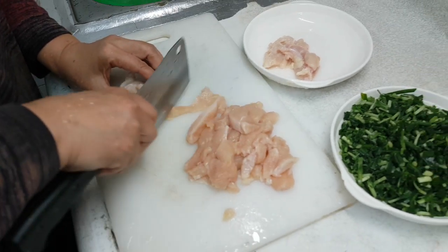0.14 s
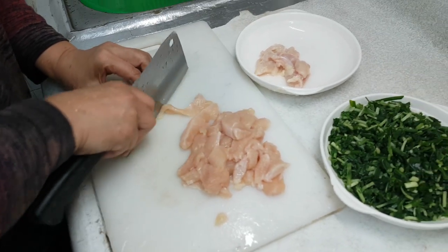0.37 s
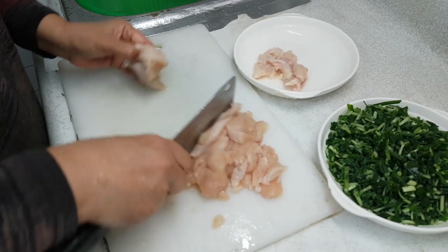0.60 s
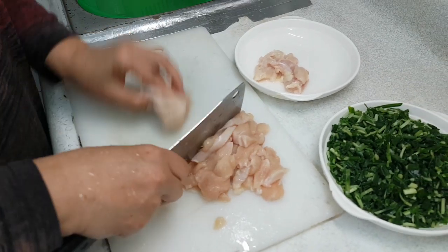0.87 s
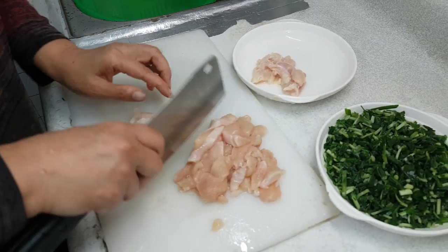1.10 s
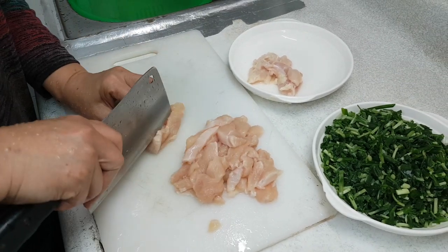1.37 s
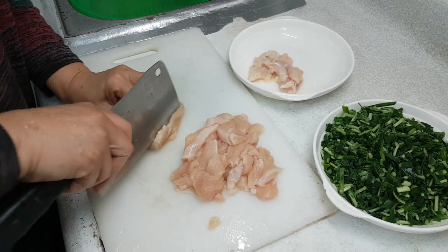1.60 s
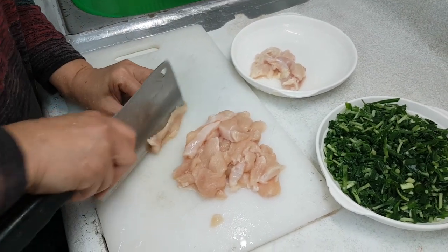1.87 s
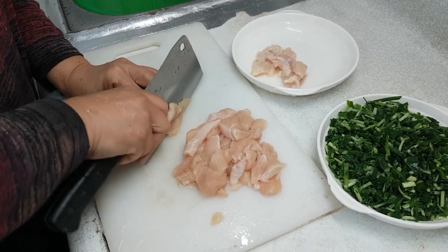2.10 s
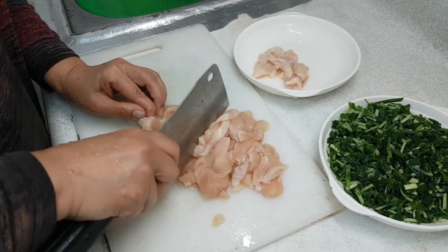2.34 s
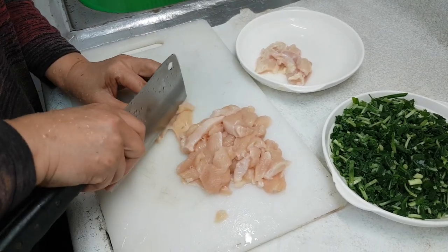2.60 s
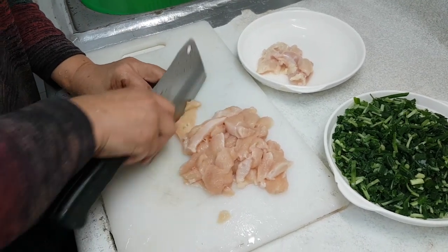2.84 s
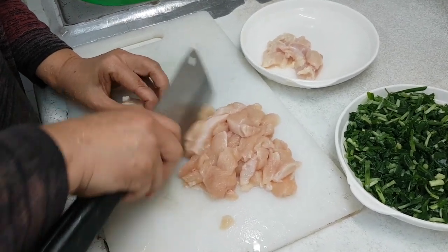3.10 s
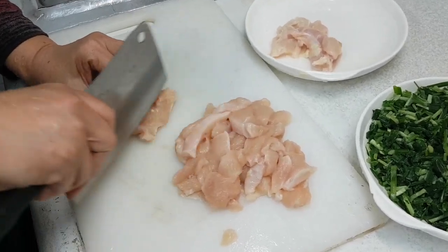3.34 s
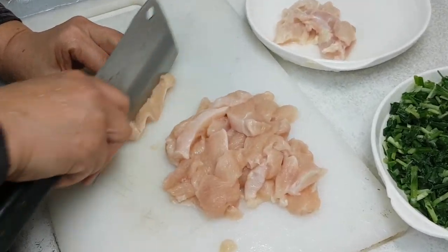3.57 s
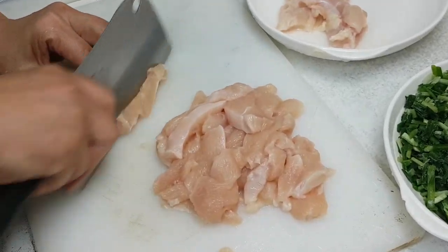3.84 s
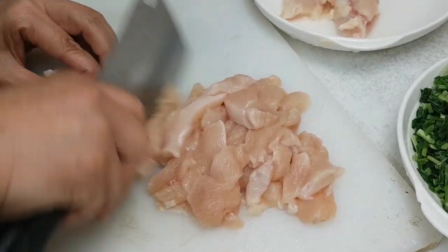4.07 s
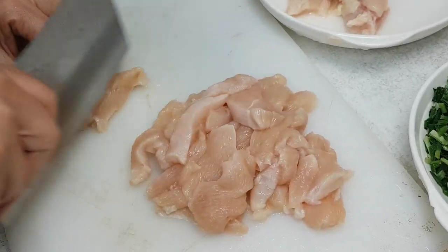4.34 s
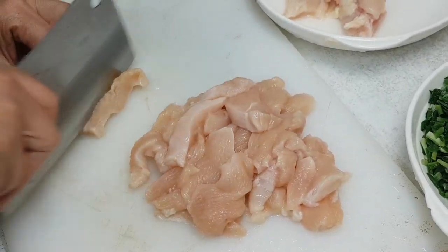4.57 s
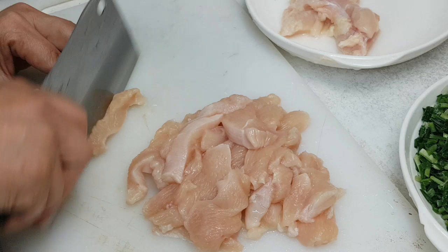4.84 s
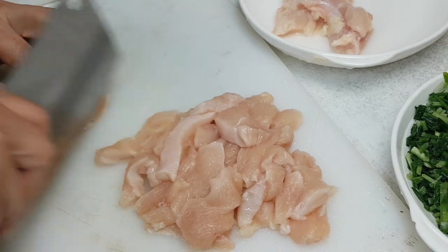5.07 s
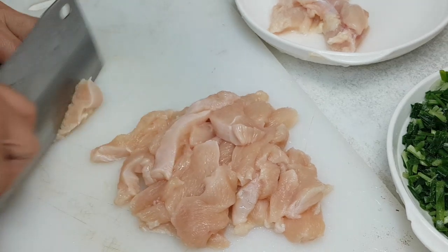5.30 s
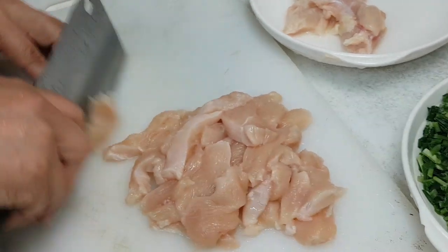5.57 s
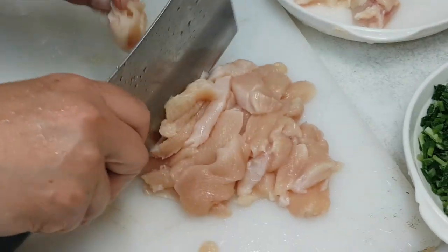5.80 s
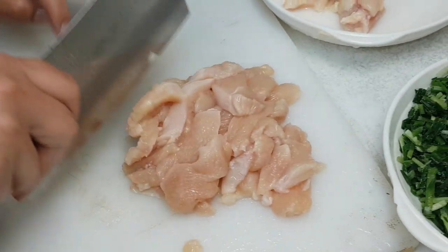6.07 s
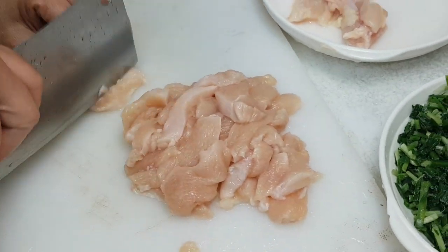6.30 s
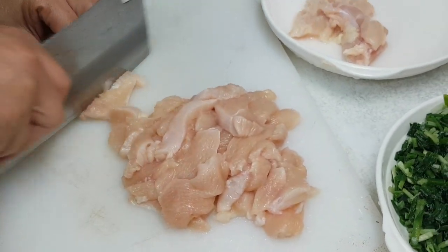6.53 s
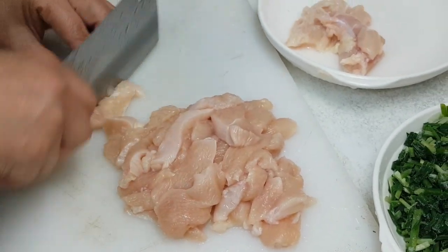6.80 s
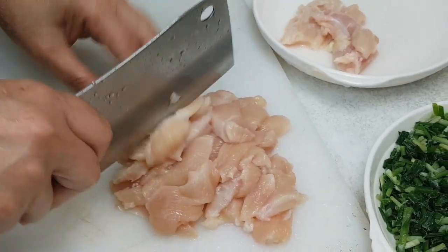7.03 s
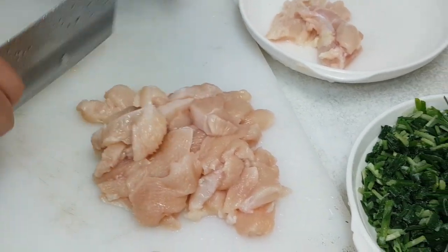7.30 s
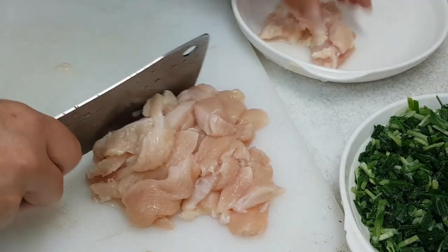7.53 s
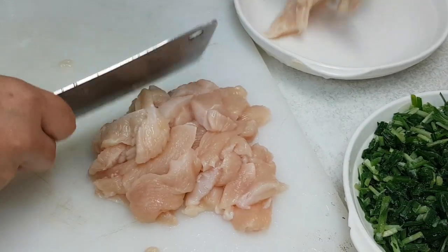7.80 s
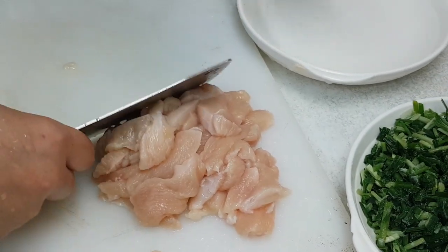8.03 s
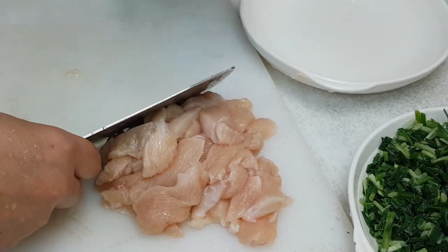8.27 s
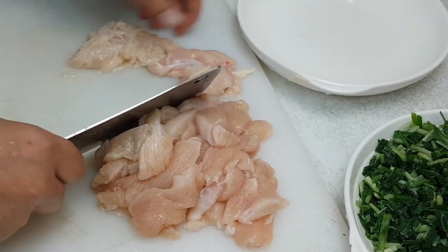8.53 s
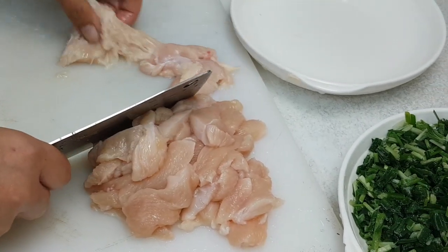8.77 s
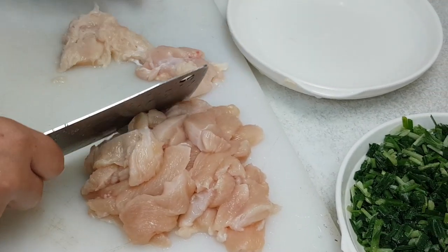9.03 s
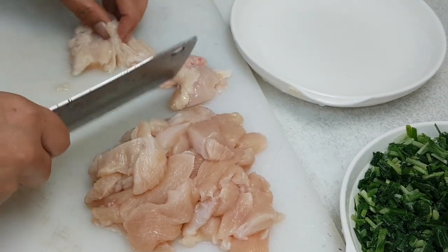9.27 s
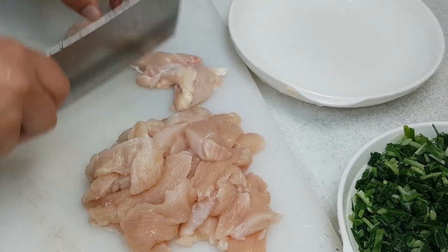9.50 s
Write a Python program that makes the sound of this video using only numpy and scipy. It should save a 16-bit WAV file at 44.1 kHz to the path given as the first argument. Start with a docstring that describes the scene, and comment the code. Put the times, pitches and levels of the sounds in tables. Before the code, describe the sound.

Irregular cleaver knocks and short dragging scrapes through wet raw meat on a plastic cutting board, close up, over faint appliance hum.

```python
"""Knocks, scrapes and wet smacks: a cleaver slices raw meat on a plastic board on a kitchen counter.
It is heard half a metre away at a hand-held phone. Blows and dragged edge make board and blade ring,
the counter top booms, the edge squeaks on wet plastic and meat lets go in short bursts of noise.
Fingers tick on the phone's right end; a small hard kitchen echoes the cutting over a faint appliance hum."""
import sys
import numpy as np
from scipy import signal
from scipy.fft import rfft, irfft, next_fast_len
from scipy.io import wavfile
from scipy.ndimage import uniform_filter1d, map_coordinates

SR = 44100
rng = np.random.default_rng(int(sys.argv[2]) if len(sys.argv) > 2 else 0)


def linear_from_db(decibels):
    """Turn decibels (scalar or array-like) into linear amplitude factors; 0 gives 1."""
    return 10 ** (np.asarray(decibels, float) / 20)


def digitize_waveform(pressure):
    """Quantize a signal to 16-bit integers and store it at the path in sys.argv[1].

    Rows of a 2-D input are taken as channels; values are limited to [-1, 1].
    """
    field = np.atleast_2d(pressure).T
    bounded = np.clip(field, -1, 1)
    quanta = np.round(bounded * 32767).astype(np.int16)
    wavfile.write(sys.argv[1], SR, quanta)


N = 425104  # length [samples]
T = np.arange(N) / SR  # time [s]

# ways the board and the blade ring, from low to high: (pitch [Hz], level [dB], time to fall 60 dB [s])
BOARD_LOW_MODES = [(159.2, -10.5, 0.17), (304.9, -2, 0.19), (355.3, -7.5, 0.13), (452, -1.5, 0.076),
                   (601.6, -10.5, 0.13)]
BOARD_MID_MODES = [(706, -12.5, 0.1), (796, 0, 0.07), (862, -0.5, 0.062), (976.4, 0.5, 0.035),
                   (1067, -6, 0.049), (1168, -13.5, 0.099), (1330, -15, 0.0335), (1491, -9.5, 0.045),
                   (1680, -16.5, .06)]
BLADE_MODES = [(1962, -2.5, 0.057), (2169, -4.5, 0.11), (2190, -8, 0.067), (2350, 0.5, 0.048),
               (2576, -3.5, 0.044), (2793, -8, 0.061), (3284, -7.5, 0.04), (3575, -5, 0.042),
               (4580, -9, 0.034), (5320, -16.5, .03)]
# the highest ringing, of the steel edge: (pitch [Hz], level [dB], time to fall 60 dB [s])
STEEL_MODES = [(4500, -7, .05), (4900, 0, .08), (5720, -7, .05), (6600, -5, .06), (7600, -9, .04),
               (8700, -4, .05), (10200, -8, .04), (11300, -7, .04)]
# colour of the wet splash and of torn fibres: (frequency [Hz], level [dB per Hz])
HISS_COLOUR = [(900, -24), (1600, 1.5), (2300, -9), (3600, -5), (6000, -11), (9000, -16.5), (12500, -17.5),
               (15700, -17.5), (16200, -42)]


def colour(x, points):
    """Noise shaped by (frequency [Hz], level [dB]) points, then scaled to rms 1."""
    hz, db = np.transpose(points)
    size = 2 * next_fast_len(N // 2 + 1)
    f = np.maximum(np.arange(size // 2 + 1) * SR / size, 1)
    gain = linear_from_db(np.interp(np.log(f), np.log(hz), db))
    y = irfft(rfft(x, size) * gain, size)[:N]
    return y / np.std(y)


def fade(t60, size):
    """Exponential decay that falls 60 dB in t60 seconds."""
    return np.exp(-np.log(1000) * np.arange(size) / SR / t60)


def ring(modes, spot=0, rise_s=0.00013):
    """Sound of a struck object, peak 1: fading sines whose pitch and share shift with the place of contact."""
    t = T[:SR // 3]
    hz, db, t60 = np.transpose(modes)[:, :, None]
    spot = np.reshape(spot, (-1, 1))[:len(modes)]
    share = linear_from_db(db + 2.5 * spot)
    shifted_hz = hz * (1 + 0.02 * spot[::-1])
    h = np.sum(share * fade(t60, len(t)) * np.sin(2 * np.pi * shifted_hz * t), axis=0)
    h = h * np.sin(np.pi / 2 * np.minimum(t / rise_s, 1)) ** 2  # the contact takes time to build
    return h / np.max(np.abs(h))


def through(x, h):
    """Every sample of x sets off a copy of h (convolution), cut to length."""
    return signal.fftconvolve(x, h)[:N]


def add(track, s, piece):
    """Mix a piece in at time s."""
    i = int(s * SR)
    track[..., i:i + piece.shape[-1]] += piece[..., :N - i]


def walk(rate):
    """Slow random wandering, spread 1; a higher rate [Hz] wanders faster."""
    k = int(SR / rate)
    steps = np.repeat(rng.standard_normal(N // k + 1), k)
    smooth = uniform_filter1d(uniform_filter1d(steps, k), k)[:N]
    return smooth / np.std(smooth)


def swells(rows):
    """Power of each row's swell per millisecond, peak 1, with the columns after peak time, rise and fall."""
    s, rise, fall, *columns = np.transpose(rows)[:, :, None]
    t = np.arange(0, N / SR + .01, .001)
    away = np.where(t < s, (s - t) / rise, (t - s) / fall)
    # 30.5 dB down after one rise or fall time; a power of 1 would be straight in dB, more rounds the top
    return linear_from_db(-2 * 30.5 * np.minimum(away, 10) ** 1.2), columns


def per_sample(x):
    """Millisecond values spread over the samples."""
    return np.interp(T * 1000, np.arange(len(x)), x)


def summed(power, db):
    """Amplitude per sample of overlapping swells, whose powers add."""
    return per_sample(np.sqrt(np.sum(power * linear_from_db(2 * db), axis=0)))


def turning(hz, wobble, rate):
    """Phase of a tone whose pitch wavers: the running sum of its frequency."""
    return 2 * np.pi * np.cumsum(hz * (1 + wobble * walk(rate))) / SR


def pair(x, lag_s, pan_db, order=3):
    """Two microphone ports: the right one hears it later, by a lag that drifts as hand and blade move."""
    late = np.arange(N) - lag_s * SR * (1 + 0.56 * walk(4))
    left = x * linear_from_db(pan_db / 2)
    right = map_coordinates(x, [late], order=order) * linear_from_db(-pan_db / 2)
    return np.array([left, right])


def air():
    """Appliance hum and microphone hiss: shared and opposite noise, mixed to be alike only in the bass."""
    # colour of hum and hiss: (frequency [Hz], level [dB per Hz])
    air_colour = [(15, -20.5), (25, 6), (45, -6), (100, -3.5), (160, -7), (300, -13.5), (480, -10),
                  (620, -16.5), (1300, -23.5), (2100, -13.5), (3200, -26.5), (5000, -35.5), (9000, -42.5),
                  (12000, -35.5), (15700, -30.5), (16100, -57.5)]
    # likeness of left and right before the final mix: (frequency [Hz], likeness [-1 to 1])
    likeness = [(60, 0.82), (130, 0.84), (290, -0.27), (640, -0.093), (1410, -0.59), (3100, -0.44),
                (6820, -0.0018), (15000, -0.15)]
    hz, alike = np.transpose(likeness)
    parts = []
    for sign in (1, -1):
        noise = colour(rng.standard_normal(N), air_colour)
        parts.append(colour(noise, np.transpose([hz, 10 * np.log10(1 + sign * alike)])))
    mid, side = parts
    left = linear_from_db(-1.5) * (mid + linear_from_db(-7.5) * side)
    right = linear_from_db(1.0) * (mid - linear_from_db(-4) * side)
    return linear_from_db(-62.5) * np.array([left, right])


def kitchen(x):
    """Small hard room: dense echo as fading noise, its own for each port, shorter in the treble."""
    out = []
    for noise in rng.standard_normal((2, SR // 2)):
        low = signal.lfilter([.25], [1, -.75], noise)
        treble = noise - low
        h = low * fade(0.18, len(low)) + treble * fade(0.13, len(low)) * linear_from_db(5.5)
        h = h * np.minimum(1, T[:len(h)] / 0.0031)  # the echo builds up over 3.1 ms
        out.append(through(x, h / np.sqrt(np.sum(h ** 2))))
    return np.array(out)


def taps():
    """Fingers shift on the phone: a tick, lumpy tail and low bump, carried by the case mostly to the right."""
    # (time [s], level before filter and doubling [dB], pitch [Hz], bump relative to the tap [dB],
    #  left relative to right [dB], time to fall 60 dB [s])
    finger_taps = [(0.818, -27, 1113, -5, -31, 0.004), (2.659, -40.5, 517, -8, -30, 0.016),
                   (4.199, -51, 1250, -4, -7, 0.036), (4.246, -45, 705, -15, -28, 0.093),
                   (4.289, -47, 572, -21, -24, 0.031), (4.329, -37.5, 350, -11, -24, 0.0092),
                   (5.248, -49.5, 898, -14, -20, 0.057), (5.286, -42, 416, -10, -26, 0.074),
                   (5.7137, -30, 612.5, 0, -18, 0.13), (5.7362, -26, 570, -1, -26, 0.056),
                   (5.762, -31.5, 463, -4, -24, 0.067), (5.809, -45, 784, -4, -19, 0.061),
                   (5.829, -38.5, 485, 8, -18, 0.05), (5.847, -33, 503, -7, -27, 0.018)]
    out, t = np.zeros((2, N)), T[:4096]
    size = len(t)
    dull = signal.butter(4, 1700, fs=SR, output="sos")
    fleshy = signal.butter(2, [180, 800], "band", fs=SR, output="sos")
    chance = rng.standard_normal((len(finger_taps), size))
    for (s, db, hz, bump_db, pan_db, t60), noise in zip(finger_taps, chance):
        tick = -(0.75 * fade(0.004, size) + 0.33 * fade(t60, size)) * np.cos(2 * np.pi * hz * t)
        lumps = 1.83 * fade(t60 + 0.01, size) * signal.sosfilt(fleshy, noise)
        bump = linear_from_db(bump_db) * fade(0.032, size) * np.sin(2 * np.pi * 170 * t)
        gains = 2 * linear_from_db(db + np.array([[pan_db], [0]]))
        add(out, s, gains * signal.sosfilt(dull, tick + lumps + bump))
    return out


def boom():
    """The counter's lowest mode under the pressing blade: a wavering tone and a rumble of looser neighbours."""
    # one row per swell: (peak time [s], rise [s], fall [s], level [dB], pitch [Hz])
    pushes = [(.276, 0.035, .1, -36.5, 105.3), (.444, 0.16, .17, -38, 100.3),
              (.6, 0.069, .16, -47.5, 108.2), (.834, 0.021, .05, -43, 92), (.998, 0.065, .2, -47.5, 94.8),
              (1.82, 0.2, .14, -52, 105), (2.095, 0.029, 0.063, -29, 78.5),
              (2.145, 0.068, .2, -35.5, 82.66), (2.81, 0.036, .2, -58.5, 108.8),
              (2.925, .025, .11, -37.5, 104.1), (3.046, 0.11, .25, -45.5, 97.6),
              (3.61, 0.042, .28, -55.5, 96.56), (3.862, 0.029, .2, -51.5, 100), (3.938, .06, .2, -37, 106),
              (4.114, 0.12, .07, -43.5, 101.4), (4.74, 0.089, .19, -38, 100),
              (4.984, 0.096, .1, -36, 101.8), (5.09, 0.11, .18, -50.5, 99.14),
              (5.276, 0.069, .07, -61.5, 112.1), (5.385, 0.067, .15, -46.5, 103),
              (5.447, 0.033, 0.092, -31.5, 100), (5.5, 0.058, .16, -37, 100),
              (5.684, 0.17, .12, -45.5, 120.9), (5.84, 0.13, .04, -46.5, 111.2),
              (6.02, .04, .26, -43, 101.9), (6.604, .045, .05, -38, 97.8),
              (6.685, .025, 0.0916, -31.5, 100), (6.755, 0.11, 0.21, -41.5, 97.8),
              (6.902, 0.13, .17, -46, 105), (7.442, 0.028, .07, -31.5, 97.7), (7.49, 0.043, .3, -48, 100),
              (7.654, .04, .22, -43.5, 97), (8.076, 0.056, .14, -43.5, 99), (8.244, 0.059, .18, -45.5, 100),
              (8.515, 0.047, .15, -35, 98.9), (8.6, 0.075, .3, -49, 99.3), (9.24, 0.071, .12, -52, 103.8),
              (9.442, .12, .2, -54, 84.5)]
    power, (db, hz) = swells(pushes)
    power = power * linear_from_db(2 * db)
    rest, rest_hz = linear_from_db(2 * -74), 100  # faint power and pitch between pushes
    total = np.sum(power, axis=0) + rest
    pitch = per_sample((np.sum(power * hz, axis=0) + rest * rest_hz) / total)  # the strongest push leads
    tone = np.sqrt(2) * np.sin(turning(pitch, wobble=0.061, rate=17))
    rumble = colour(rng.standard_normal(N),
                    [(20, -6.5), (45, -8.5), (100, 4), (160, -4.0), (240, -13.5), (500, -55)])
    return per_sample(np.sqrt(total)) * (tone + linear_from_db(-4.0) * rumble)


def smacks():
    """Wet meat lets go of steel or skin: short fading bursts of noise in one high band."""
    # (time [s], level, set 1.5 dB lower before filtering [dB], pitch [Hz], time to fall 60 dB [s])
    releases = [(0.0513, -42.5, 8340, 0.012), (1.0497, -58, 7700, 0.041), (1.0888, -56, 13700, 0.03),
                (1.4636, -57, 13740, 0.03), (1.7218, -54, 13900, 0.029), (2.414, -39, 12800, 0.013),
                (3.356, -44, 6420, 0.024), (4.158, -46.5, 6640, 0.054), (4.8424, -57, 4340, 0.03),
                (6.352, -48, 15000, 0.034), (7.1852, -53, 8400, 0.03), (7.7816, -52, 4850, 0.047),
                (7.9967, -49, 8400, 0.025), (8.712, -47, 4940, 0.038), (8.794, -55, 10970, 0.039),
                (8.835, -47.5, 4840, 0.033), (8.9231, -56.5, 8280, 0.047), (9.2237, -60, 4320, 0.021)]
    out = np.zeros(N)
    for (s, db, hz, t60), noise in zip(releases, rng.standard_normal((len(releases), 4096))):
        band = signal.butter(2, [hz * 0.84, hz * 1.14], "band", fs=SR, output="sos")
        add(out, s, linear_from_db(db - 1.5) * signal.sosfilt(band, noise) * fade(t60, len(noise)))
    return out


def squeak():
    """The edge sings on wet plastic: a tone and its octave sink as they fade, fluttering with grip and slip."""
    # (peak time [s], rise [s], fall [s], tone level before flutter [dB], octave level before flutter [dB])
    slips = [(2.125, 0.033, 0.15, -47.5, -55), (2.955, 0.1, 0.1, -55, -62),
             (3.964, 0.078, 0.19, -49, -55.5), (4.11, 0.066, 0.023, -49, -60),
             (4.74, 0.056, 0.14, -45, -57), (5.466, .07, 0.13, -52, -57), (6.69, 0.064, .13, -47, -59)]
    power, (db, octave_db) = swells(slips)
    grip = per_sample(np.max(power, axis=0) ** .15)
    pitch = 1225 - 40 * (1 - grip)  # [Hz], 40 Hz lower when the grip is gone
    phase = turning(pitch, wobble=0.01, rate=70)
    tone = linear_from_db(4 * walk(50)) * summed(power, db) * np.sin(phase)
    octave = linear_from_db(4 * walk(50)) * summed(power, octave_db) * np.sin(2 * phase)
    return np.sqrt(2) * (tone + octave)


def drag():
    """The edge drags through meat and over plastic: stick-slip grains shake board and blade, fibres hiss."""
    # one row per swell of scraping; a long stroke or a blow's tail may take several; levels before flicker:
    # (peak time [s], rise [s], fall [s], board level [dB], blade level [dB], hiss level [dB])
    scrapes = [(.29, 0.023, 0.19, -49.5, -73, -88), (.362, 0.014, .15, -52, -56, -63),
               (.386, 0.061, 0.16, -50, -52.5, -59), (.552, 0.033, 0.12, -33, -33, -43.5),
               (.595, 0.069, 0.049, -45, -50, -33.5), (.99, 0.02, .2, -52, -64, -71),
               (1.785, 0.13, 0.068, -52.5, -66, -67.5), (2.03, 0.026, 0.3, -53, -65, -66),
               (2.07, 0.086, 0.048, -45, -59, -64), (2.095, 0.12, 0.16, -39.5, -52, -58.5),
               (2.32, 0.21, 0.23, -66.5, -66, -65), (2.84, 0.054, 0.094, -50.5, -67, -62),
               (2.9, 0.23, 0.21, -53, -55.5, -61), (3.125, 0.25, 0.11, -50.5, -53, -57.5),
               (3.625, 0.086, .08, -49.5, -70, -66), (3.8, 0.12, 0.029, -58, -74, -73.5),
               (3.9, 0.06, 0.082, -37.5, -50, -54), (3.96, 0.092, 0.14, -52.5, -56.5, -59),
               (4.108, 0.18, 0.066, -49.5, -56, -56.5), (4.2, 0.065, 0.049, -66, -60, -65),
               (4.27, 0.054, 0.17, -65.5, -61.5, -70), (4.685, 0.078, 0.095, -39.5, -51, -59),
               (4.71, 0.041, .14, -49, -56, -56), (4.88, 0.087, 0.19, -51.5, -59, -59),
               (4.93, 0.083, 0.036, -47.5, -53, -56.5), (4.99, 0.033, 0.16, -44.5, -63, -66),
               (5.275, 0.065, 0.1, -62, -72, -77), (5.38, 0.072, 0.45, -46, -54.5, -57.5),
               (5.44, 0.086, 0.2, -55, -66, -75), (5.6, 0.12, .05, -56, -60, -61),
               (5.64, 0.064, 0.083, -37.5, -44.5, -46), (5.735, 0.068, 0.11, -57, -64, -63.5),
               (5.845, 0.083, 0.02, -55, -61, -72), (6.02, 0.036, 0.17, -50, -61, -66),
               (6.318, 0.0089, 0.031, -71, -56, -78), (6.6, 0.022, .1, -48, -59, -61),
               (6.66, 0.065, 0.17, -45, -49, -55.5), (6.84, 0.093, 0.091, -53.5, -56, -59.5),
               (6.888, 0.039, 0.091, -42, -42, -44.5), (7.0, 0.031, 0.068, -60, -67, -63),
               (7.432, .012, 0.13, -26.5, -39.5, -48), (7.48, 0.065, 0.065, -52, -38.5, -42),
               (7.664, 0.025, 0.17, -58, -74.5, -69.5), (8.08, 0.031, 0.13, -47, -60, -76),
               (8.497, 0.04, 0.16, -44, -47.5, -50), (8.69, .08, 0.07, -59.5, -66.5, -74),
               (9.035, .04, 0.039, -68, -74, -89.5), (7.83, .04, 0.066, -68, -75, -79.5),
               (9.245, .07, .07, -62, -70, -70), (9.435, .03, 0.12, -45.5, -73, -84)]
    # faint rubbing between scrapes, before it wanders: (board level [dB], blade level [dB], hiss level [dB])
    rubbing = (-79, -86, -83)
    power, dbs = swells(scrapes)
    fidget = 1.4 * walk(11)  # [dB]
    board, blade, hiss = (np.hypot(summed(power, db), linear_from_db(rest_db + fidget))
                          for db, rest_db in zip(dbs, rubbing))
    shaken = (
        (BOARD_LOW_MODES, board * linear_from_db(-4), .002),
        (BOARD_MID_MODES, board, .0008),
        (BLADE_MODES, blade, .0004),
        (STEEL_MODES, hiss * linear_from_db(-8.5), .0003),
    )
    out, lumps = 0, walk(70)
    damping = fade(.14, SR // 3)
    for modes, gain, rise_s in shaken:
        uneven_db = 2.35 * rng.exponential(size=N) + 2.7 * lumps
        grains = rng.standard_normal(N) * linear_from_db(uneven_db)
        h = ring(modes, rise_s=rise_s) * damping  # the pressed edge shortens the ring
        out = out + through(grains * gain, h) / np.std(grains) / np.sqrt(np.sum(h ** 2))
    flicker = linear_from_db(1.7 * lumps + 4.9 * walk(400))
    return out + hiss * flicker * colour(rng.standard_normal(N), HISS_COLOUR)


def knocks():
    """Blade or meat meets the board: a push and a short rattle ring the modes, with a crack and wet splash."""
    # (time [s], level of the middle modes [dB], low modes [dB], high modes [dB], splash [dB],
    #  time for the rattle to fall 60 dB [s]); levels after the first are relative to it
    contacts = [(0.251, -15, -5.5, -24.5, -42.5, 0.0066), (0.379, -32.5, -6, -31, -31.5, 0.043),
                (0.545, -40, -26, -2, -14, .04), (0.961, -34, -2, -6, -8, 0.044),
                (1.378, -52.5, -12, -4, 2, 0.0088), (2.085, -26, 4, -11.5, -18, 0.028),
                (2.365, -48.5, -7.5, -13, -9, 0.043), (2.893, -30, -38, -33, -19.5, 0.15),
                (3.128, -30.5, -11, -11, -13.5, 0.039), (3.211, -51, -13, -2, -8.5, 0.05),
                (3.86, -39, -11, -23, -24, 0.061), (3.899, -36, 4, -8, -35, 0.026),
                (4.093, -37.5, -10, 3, -33, 0.048), (4.031, -44, 0, -30, -30, 0.02),
                (4.672, -38.5, -7, -28, -30, 0.043), (4.704, -38.5, -16, -14, -1, 0.043),
                (4.94, -22, -3.5, -26, -31, 0.012), (4.96, -14, -6.5, -18.5, -25, 0.01),
                (5.354, -32, 0, -28, -32, 0.015), (5.421, -37.5, -24, -11, -11.5, 0.1),
                (5.616, -28.5, -36, -8, -19, 0.029), (5.634, -26.5, -6, -12, -13.5, 0.018),
                (5.646, -20, -6, -8.5, -18.5, 0.021), (5.993, -25.5, -13, -10, -13.5, 0.033),
                (6.317, -63.5, -14, 2, 13, 0.019), (6.585, -26.5, -6, -28, -36, 0.016),
                (6.662, -32.5, -12, -3.5, -18, 0.03), (6.875, -29, -11.5, -14, -18.5, 0.026),
                (6.89, -26, -30, -4, -23, 0.036), (7.4183, -3, -27, -15.5, -50, 0.028),
                (7.65, -51.5, 12.5, 3, -43, 0.06), (8.048, -20.5, -5, -9, -57, 0.02),
                (8.226, -57, 13.5, -14.5, -29.5, 0.037), (8.476, -39.5, -2, -7, -9, 0.014),
                (8.484, -30.5, -15, 9.5, 7.5, 0.04), (9.215, -55, -26.5, -17, -14, 0.065),
                (9.404, -18.5, -10.5, -22.5, -60, 0.03)]
    # the bare edge clinks: (time [s], level [dB])
    clinks = [(4.7047, -39.5), (7.451, -32), (7.4809, -28)]
    # a bowl on the counter hums after three of the blows: (time [s], level [dB])
    bowl_hums = [(.255, -42), (4.965, -45), (9.408, -45.5)]
    # the bowl's one way of ringing: (pitch [Hz], level before scaling to peak 1 [dB], time to fall 60 dB [s])
    bowl_modes = [(626, 0, 0.43)]
    out, splash = np.zeros(N), np.zeros(N)
    chance = rng.standard_normal((len(contacts), 8192))
    for (s, db, low_db, high_db, wet_db, t60), noise in zip(contacts, chance):
        size = len(noise)
        rattle = .45 * noise * fade(t60, size) / np.sqrt(t60 * SR / (2 * np.log(1000)))
        rattle[0] = 1  # the push itself
        struck = (
            (BOARD_LOW_MODES, low_db, .005),
            (BOARD_MID_MODES, 0, .0019),
            (BLADE_MODES, high_db, .0006),
        )
        for modes, share_db, rise_s in struck:
            rung = through(rattle, ring(modes, noise[-10:], rise_s))
            add(out, s, linear_from_db(db + share_db) * rung / np.max(np.abs(rung)))
        wet = linear_from_db(db + wet_db) * fade(t60 + 0.062, size)
        crack = linear_from_db(db + high_db - 14.5) * fade(0.014, size)
        add(splash, s, wet + crack)
    for (s, db), noise in zip(clinks, rng.standard_normal((len(clinks), 4096))):
        rung = through(noise * fade(0.033, len(noise)), ring(STEEL_MODES, noise[-10:]))
        add(out, s, linear_from_db(db) * rung / np.max(np.abs(rung)))
    for s, db in bowl_hums:
        add(out, s, linear_from_db(db) * ring(bowl_modes, rise_s=0.023))
    return out + splash * colour(rng.standard_normal(N), HISS_COLOUR)


def scene():
    """Cutting near the phone, its echo, the boom through the counter, fingers and air, all added up."""
    cut = knocks() + drag() + smacks() + squeak()
    direct = pair(cut, lag_s=.00009, pan_db=0.26)
    echo = linear_from_db(-6.0) * kitchen(cut)
    counter = pair(boom(), lag_s=.0001, pan_db=-4.0, order=1)
    return direct + echo + counter + taps() + air()


def roll_off(x):
    """The treble ends steeply here."""
    return signal.sosfilt(signal.butter(12, 16490, fs=SR, output="sos"), x)


def record(dry):
    """The phone takes in the finished mix as it is."""
    return roll_off(dry)


dry = scene()
out = record(dry)
digitize_waveform(out)
```